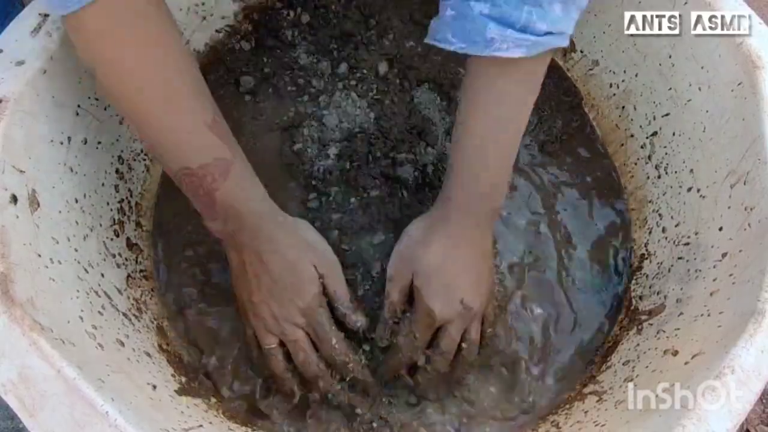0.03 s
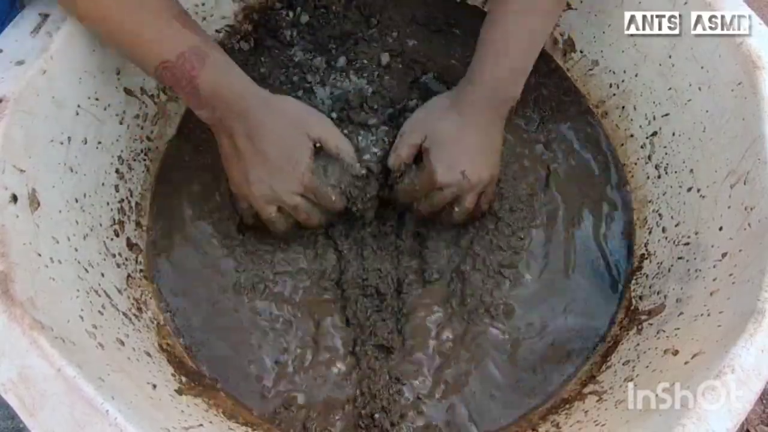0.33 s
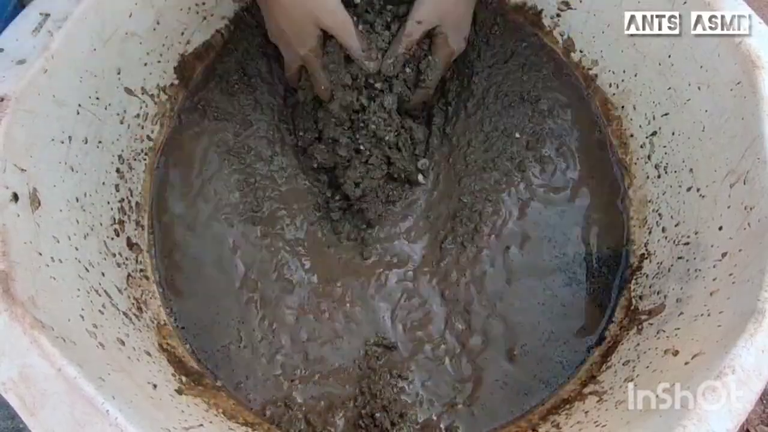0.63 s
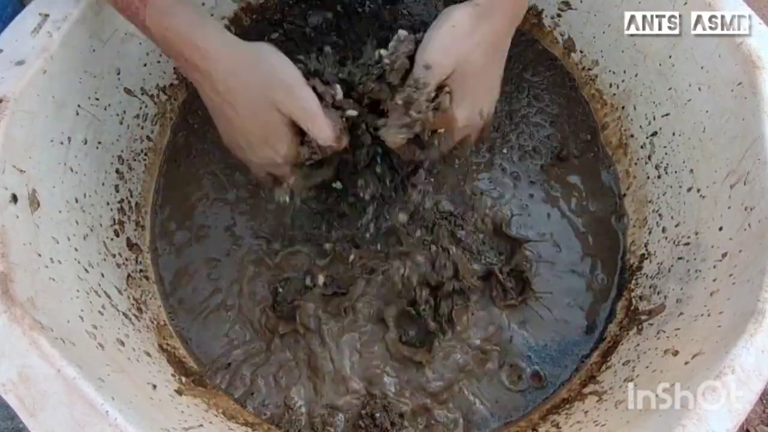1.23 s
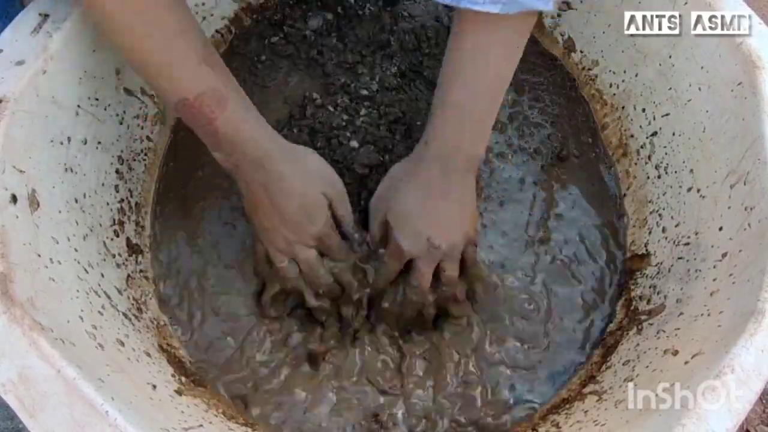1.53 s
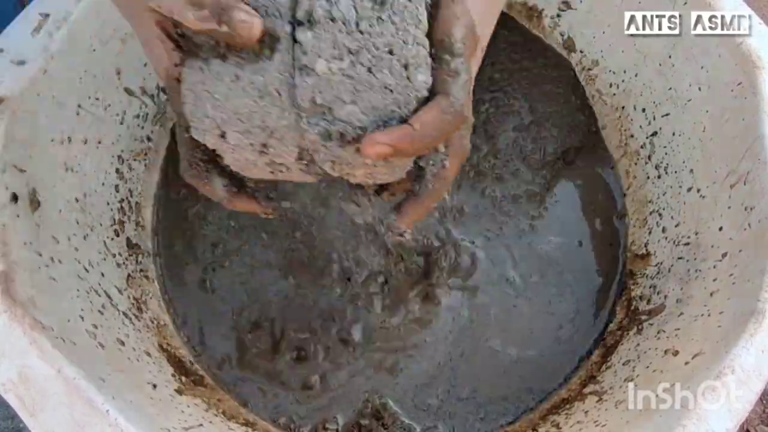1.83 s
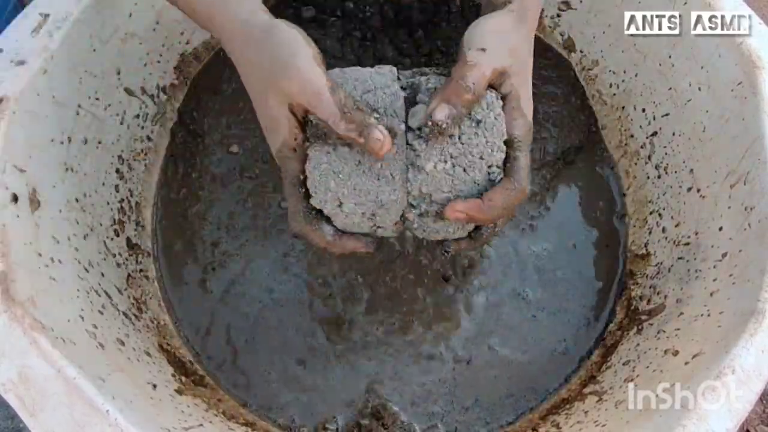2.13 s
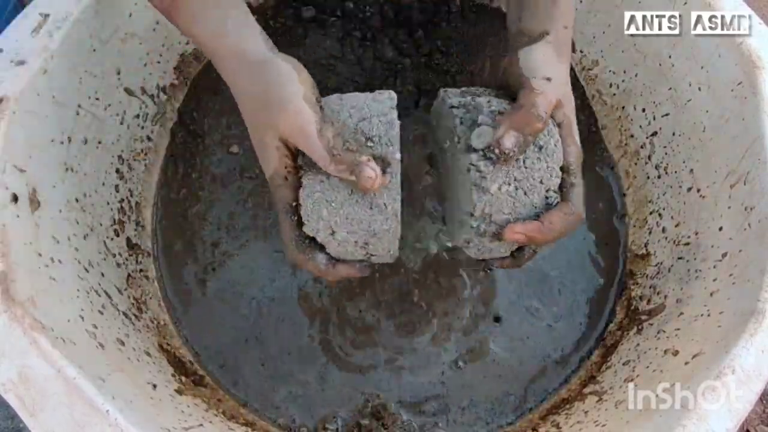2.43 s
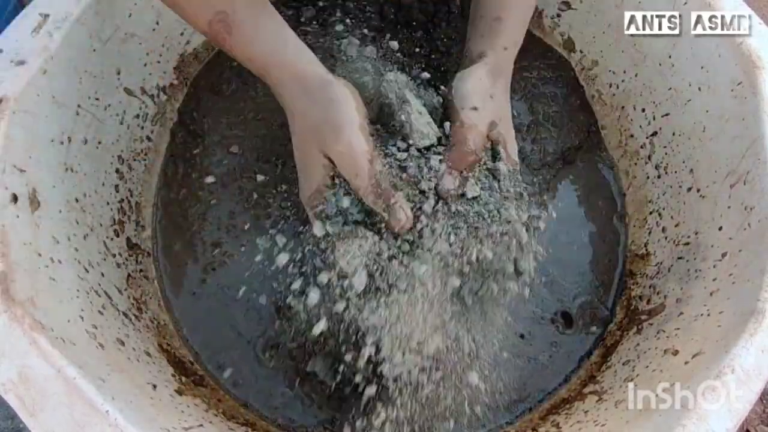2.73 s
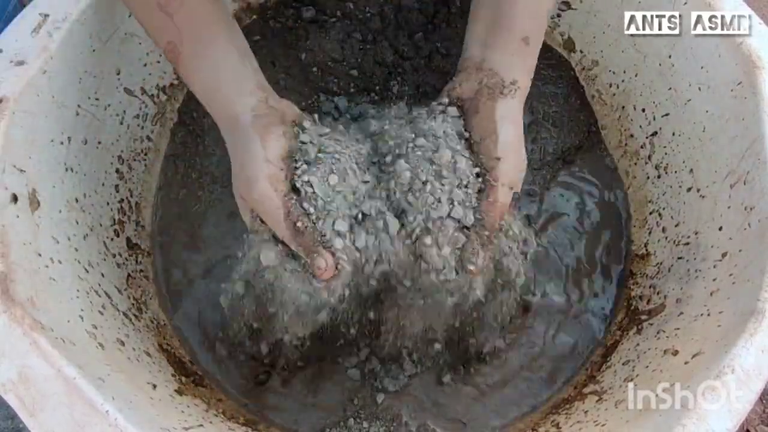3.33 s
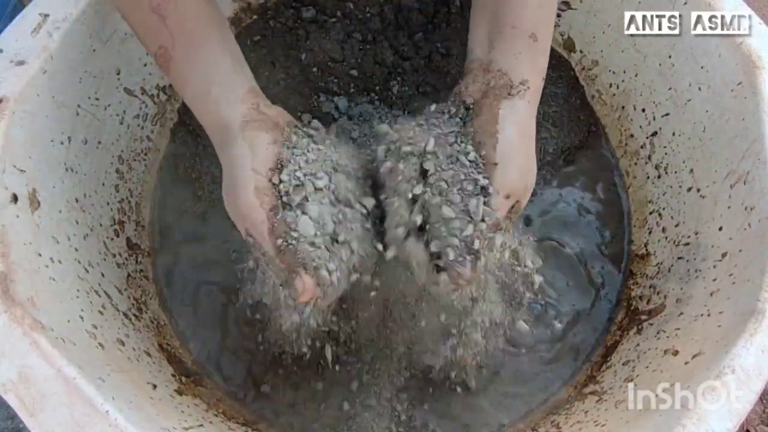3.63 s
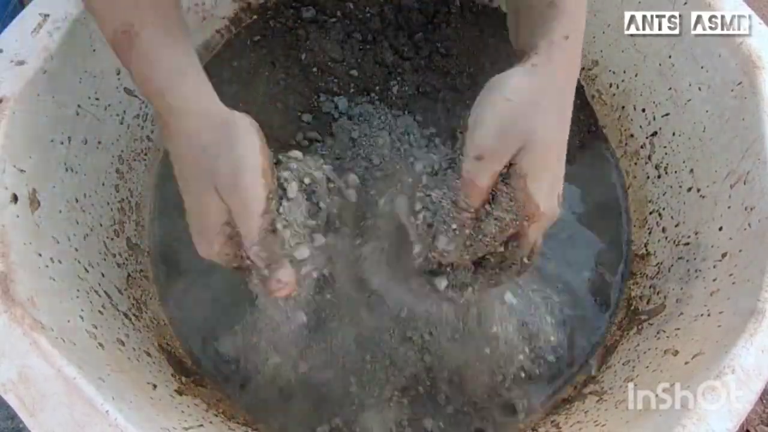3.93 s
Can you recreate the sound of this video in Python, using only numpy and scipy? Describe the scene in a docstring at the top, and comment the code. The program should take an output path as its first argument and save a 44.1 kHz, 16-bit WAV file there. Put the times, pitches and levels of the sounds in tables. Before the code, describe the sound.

Hands rake wet gritty mud in water, then dry blocks knock and crumble into it.

```python
"""Raking mud and crumbling dry blocks

Hands rake wet grit through a tub of muddy water and let it dribble back, while puffs of air buffet
the microphone. After an abrupt cut, two dry blocks shed sand, knock together, collapse and are
crumbled into the water. A low outdoor rumble lies under it all. The grit is made of thousands of
tiny impacts, and each bubble is a short ring that rises in pitch."""
import sys
import numpy as np
from scipy import signal
from scipy.fft import rfft, irfft, next_fast_len
from scipy.io import wavfile
from scipy.ndimage import uniform_filter1d, map_coordinates

SR = 44100
rng = np.random.default_rng(int(sys.argv[2]) if len(sys.argv) > 2 else 0)


def unload_wav(signal):
    """Save mono or channel-first audio to the path in sys.argv[1] as 16-bit WAV at rate SR, clipped to [-1, 1]."""
    wavfile.write(
        sys.argv[1],
        SR,
        np.round(np.clip(np.atleast_2d(signal).T, -1, 1) * 32767).astype(np.int16),
    )


N = 176400
CUT_S = 1.615  # the mud scene ends and the block scene begins

# How loud each action is over time. Levels in all tables are before mixing.
# Raking the mud: time_s, slosh_db, scrape_db, fizz_db
RAKING = [(0.005, -13, -28.5, -28), (0.017, -27, -36, -29), (0.031, -41, -28, -31), (0.079, -29, -42, -41),
          (0.133, -27.5, -25.5, -41), (0.173, -29.5, -27, -31), (0.321, -30, -29.5, -35.5),
          (0.451, -28.5, -29, -35), (0.589, -24, -27.5, -34.5), (0.639, -29, -32, -38),
          (0.799, -29.5, -32, -37.5), (0.879, -31.5, -33.5, -38.5), (1.075, -32.5, -29.5, -34.5),
          (1.295, -43, -32.5, -29.5), (1.365, -43, -35, -34.5), (1.425, -56, -47.5, -42.5),
          (1.46, -33, -36.5, -39), (1.555, -30.5, -33, -41), (1.61, -31.5, -37, -43.5)]
# Sand trickling off the blocks: time_s, patter_db, hiss_db
TRICKLE = [(1.63, -45, -42), (1.634, -47.5, -39), (2.212, -51, -44.5), (2.246, -54, -53),
           (2.518, -58.5, -56), (2.558, -53, -54), (2.6, -70, -86)]
# Crumbling the blocks: time_s, crunch_db, grit_db, hiss_db
CRUMBLE = [(2.66, -45, -47.5, -46), (2.69, -48.5, -55, -46), (2.735, -29, -39.5, -34),
           (2.768, -23, -30.5, -26), (2.794, -34, -31.5, -30.5), (2.868, -28.5, -34, -28.5),
           (2.95, -44.5, -41, -38), (3.152, -37.5, -36.5, -40), (3.302, -49, -48, -42.5),
           (3.532, -35, -38.5, -37.5), (3.61, -49.5, -49.5, -43), (3.652, -56, -52, -39),
           (3.69, -49.5, -51, -41.5), (3.786, -40, -41.5, -39), (3.846, -39.5, -41.5, -35),
           (3.854, -27, -30.5, -34), (3.868, -42.5, -48, -44.5), (3.924, -51, -52, -36),
           (4.0, -52, -49, -38.5)]

# The tone of each sound, from bass to treble: frequency_hz, level_db
RUMBLE_TONE = [(45, -57), (75, -8), (110, 1), (150, 2), (200, -7.5), (300, -12.5), (550, -14.5),
               (1000, -19.5), (2500, -33), (6000, -41.5)]
PUFF_TONE = [(45, -50), (70, -0.5), (100, 3.5), (170, 0.5), (260, -10), (400, -18), (800, -50.5)]
SLOSH_TONE = [(150, -46), (260, -10), (400, -20), (540, 1.5), (750, -5.5), (1100, 2), (1500, -5),
              (2100, -2), (3500, -28)]
SCRAPE_TONE = [(800, -27), (1400, -4), (1900, -3), (2600, -2), (3500, -1.5), (4500, -5.5), (5600, -14),
               (8000, -23)]
FIZZ_TONE = [(3000, -9), (4500, -7), (5700, -4.5), (7300, 6), (8600, 3.5), (10500, -3), (12500, -7.5),
             (14500, -3), (16000, -20)]
CRUNCH_TONE = [(180, -27), (380, -8.5), (580, 1.5), (760, -9.5), (1000, 0), (1400, -3), (1850, -3.5),
               (3500, -45)]
GRIT_TONE = [(800, -9.5), (1400, -6.5), (1900, -1), (2700, -1), (3800, -2.5), (4700, -10), (5800, -15),
             (8000, -20)]
SAND_TONE = [(3000, -7.5), (4500, -3), (5700, -6.5), (7400, 4.5), (8800, 1), (10800, -4.5), (12500, -2.5),
             (14500, 1), (16000, -3)]
TINKLE_TONE = [(7000, -23), (10000, -14), (12500, 0.5), (15000, 0)]

# How alike left and right are (1 is identical): frequency_hz, likeness
LIKENESS = [(250, 1), (600, 0.88), (1200, 0.72), (2200, 0.05), (4000, 0.024), (7500, 0.48), (11000, 0.34),
            (15000, 0.13)]
# How much louder the left side is: frequency_hz, left_minus_right_db
BALANCE = [(1200, 0), (2500, 0.6), (4500, 2.5), (6000, 4), (8000, 2), (9500, -0.5), (12000, 3.5),
           (15000, 12)]
# Where air hits the microphone: side, left_minus_right_db
SIDE_DB = {"left": 48, "both": 0.5, "right": -21.5}
# Puffs of air: centre_s, length_s, level_db, side
PUFFS = [(0.021, 0.023, -17.5, "left"), (0.064, 0.036, -25, "right"), (0.154, 0.064, -21.5, "right"),
         (0.256, 0.017, -21, "both"), (0.307, 0.023, -24, "right"), (0.485, 0.036, -19, "both"),
         (0.538, 0.014, -26, "left"), (0.589, 0.022, -20, "both"), (0.62, 0.026, -21.5, "right"),
         (0.705, 0.05, -27.5, "right"), (0.765, 0.026, -21, "both"), (0.837, 0.031, -23, "right"),
         (1.067, 0.024, -27.5, "left"), (1.111, 0.028, -25, "left"), (1.289, 0.043, -15, "left"),
         (1.387, 0.02, -31, "both"), (1.453, 0.031, -22, "left"), (1.516, 0.05, -20, "left"),
         (1.585, 0.026, -18.5, "left"), (1.753, 0.078, -28.5, "left"), (1.884, 0.031, -28, "left")]
# Sharp pops of air: time_s, level_db, side
POPS = [(0.029, -10.5, "left"), (0.041, -10, "right"), (0.076, -15.5, "right"), (0.119, -13.5, "right"),
        (0.171, -13, "left"), (0.594, -12.5, "right"), (0.637, -12.5, "right"), (1.256, -13, "left"),
        (1.29, -13.5, "left"), (1.322, -9, "left"), (1.36, -14, "left"), (1.673, -9.5, "left"),
        (1.776, -11, "left"), (2.266, -22.5, "right"), (3.654, -23.5, "right")]
# Single bubbles and drips: start_s, level_db, pitch_hz
DRIPS = [(1.403, -25, 2500), (1.553, -30, 1420), (1.573, -24, 730), (1.606, -16, 1426), (1.974, -38, 2070),
         (2.006, -34, 2400), (2.025, -33, 2600), (2.106, -37, 1740), (2.327, -41, 1690), (2.553, -39, 2100),
         (2.753, -18, 1020), (2.771, -33, 1100), (2.809, -20.5, 1206), (3.35, -31.5, 1670),
         (3.8515, -21, 938)]
# Grains splitting: start_s, level_db
CLICKS = [(1.24, -14), (3.4912, -12), (3.512, -20), (3.639, -9), (3.7238, -19), (3.8285, -15), (3.843, -10),
          (3.9275, -12)]
# Grains and lumps snapping: start_s, tick_db, body_db, decay_s
SNAPS = [(.045, -21, -38, 0.014), (.057, -33, -20, 0.017), (1.241, -22, -27.5, 0.046),
         (1.701, -30, -45, 0.019), (1.7602, -30, -55, 0.045), (1.779, -28, -51, 0.013),
         (1.8988, -19.5, -54, 0.015), (2.067, -31, -52, 0.028), (2.567, -34.5, -47, 0.026),
         (2.705, -37, -35, 0.036), (2.763, -28, -20, 0.037), (2.846, -24, -24, 0.024),
         (3.372, -34.5, -47, 0.26), (3.4902, -18, -36, 0.0092), (3.5105, -20.5, -25.5, 0.022),
         (3.6382, -18.5, -40, 0.009), (3.652, -27, -32, 0.03), (3.827, -19.5, -26, 0.018),
         (3.852, -24, -25, 0.012), (3.946, -29, -37, 0.032)]
# The blocks meeting: start_s, level_db
KNOCKS = [(2.628, -7), (2.6319, -13.5)]
# The notes a struck block rings with: pitch_hz, level_db, decay_s
BLOCK_NOTES = [(184, -8.5, 0.066), (278, -2, 0.025), (462, -2, .028), (653, -1, 0.021),
               (1360, -7.5, 0.0084), (1940, -17, .014), (3180, -19.5, 0.03)]
# Fingers digging in: start_s, length_s, swell_s, first_hz, last_hz, glide_bend, scatter_octaves, level_db
STROKES = [(0.116, .31, 0.052, 2610, 935, 1.67, 0.352, -30),
           (.505, 0.39, 0.066, 1750, 1034, 1.48, 0.43, -32.5),
           (1.451, .16, 0.06, 2680, 995, 0.74, 0.29, -32.5)]


def amp(db):
    """Turn decibels into a gain; a decay time is how long a sound takes to fall 60 dB."""
    return 10 ** (np.asarray(db) / 20)


def unit(x):
    """Scale a signal to an average power of 1."""
    return x / np.sqrt(np.mean(x ** 2) + 1e-20)


def along(points, hz):
    """Read between the rows of a frequency table, on a log scale."""
    freqs, values = np.transpose(points)
    return np.interp(np.log(hz + 1), np.log(freqs + 1), values)


def clock():
    """The time of every sample, in seconds."""
    return np.arange(N) / SR


def gains(rows):
    """One gain curve for each level column of a table."""
    times, *levels = np.transpose(rows)
    return [amp(np.interp(clock(), times, db)) for db in levels]


def wobble(rate):
    """A smooth curve through `rate` random values a second."""
    return map_coordinates(rng.standard_normal(4096), [clock() * rate], mode="mirror")


def filtered(x, response):
    """Scale each frequency in x by response(hz)."""
    size = next_fast_len(N + 8192)
    return irfft(rfft(x, size) * response(np.fft.rfftfreq(size, 1 / SR)), size)[..., :N]


def pan(db):
    """Left and right gains, with the left louder by db."""
    return unit(amp(np.array([[db], [-db]]) / 2))


def add(track, start_s, sound):
    """Mix a short sound into a track."""
    i = max(0, round(start_s * SR))
    part = track[..., i:i + sound.shape[-1]]
    part += sound[..., :part.shape[-1]]


def noise(tone, likeness=LIKENESS, sizes=1):
    """Stereo noise with the given tone; sizes scales each sample before the tone is shaped."""
    def response(hz):
        angle = np.arccos(np.clip(along(likeness, hz), -1, 1)) / 2
        return amp(along(tone, hz)) * [np.cos(angle), np.sin(angle)]
    mid, side = filtered(sizes * rng.standard_normal((2, N)), response)
    return unit(np.array([mid + side, mid - side]))


def patchy(x, depth_db):
    """Let resonances come and go as the water and the heap change shape."""
    spectra = signal.stft(x, nperseg=512)[2]
    patches = rng.standard_normal(spectra.shape[1:])
    for _ in range(2):
        patches = uniform_filter1d(uniform_filter1d(patches, size=4, axis=0), size=7, axis=1)
    less_in_treble = 1 / np.hypot(1, np.fft.rfftfreq(512, 1 / SR) / 6000)
    change = amp(depth_db * unit(patches) * less_in_treble[:, None])
    return signal.istft(spectra * change, nperseg=512)[1][:, :N]


def grains(tone, rate, spread, clump, patchy_db=2):
    """About `rate` tiny impacts a second; spread varies their size, clump makes them surge."""
    hits = rng.random(N) < rate / SR
    sizes = hits * np.exp(spread * np.minimum(rng.standard_normal(N), 2))
    stream = patchy(noise(tone, sizes=sizes), patchy_db)
    return unit(stream * np.exp(clump * wobble(110)))


def bubble(hz, cycles=38.4, rise=0.2):
    """A fading ring whose pitch rises as the bubble nears the surface."""
    samples = SR * cycles / hz
    age = np.arange(int(samples)) / samples  # runs from 0 to 1
    ring = np.sin(2 * np.pi * cycles * (age + rise * age ** 2 / 2))
    return ring * 0.0011 ** age * (1 - np.exp(-age * cycles))


def froth(hz, octaves, spread_db, count):
    """Many small bubbles scattered in time, pitch, loudness and place."""
    out = np.zeros((2, N))
    starts = rng.random(count) * N / SR
    scatter = np.clip(rng.standard_normal((count, 3)), -2, 2)
    for start, (pitch, size, place) in zip(starts, scatter):
        add(out, start, amp(spread_db * size) * pan(4 * place) * bubble(hz * 2 ** (octaves * pitch)))
    return unit(out)


def rumble():
    """A low, steady outdoor rumble."""
    return amp(-40) * noise(RUMBLE_TONE, likeness=[(60, 0.47), (150, 0.97), (600, 0.27), (2000, 0.061)])


def air(pop_hz=157):
    """Puffs and pops of air hit the microphone's two openings unequally."""
    t, puffs, pops = clock(), np.zeros((2, N)), np.zeros((2, N))
    for centre, length, db, side in PUFFS:
        puffs += amp(db) * pan(SIDE_DB[side]) * np.exp(-2 * ((t - centre) / length) ** 2)
    for centre, db, side in POPS:
        away = (np.pi * pop_hz * (t - centre)) ** 2
        pops += amp(db) * pan(SIDE_DB[side]) * (2 * away - 1) * np.exp(-away)
    swirl = noise(PUFF_TONE, likeness=[(100, 0)])
    swirl /= np.sqrt(np.abs(uniform_filter1d(swirl ** 2, size=800)) + 0.021)  # even out its loudness
    draught = amp(-38.5) * (t < CUT_S)
    return (puffs + draught) * swirl + pops


def tub(x, decay_s=0.013, echo_db=-11):
    """Add quick echoes from the walls of the tub."""
    t = clock()[:SR // 6]
    tail = rng.standard_normal((2, len(t))) * amp(-60 * t / decay_s) * (t > .0015)
    echoes = signal.fftconvolve(x, tail / np.linalg.norm(tail[0]), axes=1)[:, :N]
    return x + amp(echo_db) * echoes


def tinkle():
    """Fine grains and droplets make sparse, very bright ticks."""
    return grains(TINKLE_TONE, rate=320, spread=0.59, clump=0.085)


def dribble(centre_s=1.22, width_s=0.18):
    """Wet grit pours from the lifted hands and sprays on the water."""
    swell = np.exp(-((clock() - centre_s) / width_s) ** 2)
    return amp(-29.5) * swell * grains(TINKLE_TONE, rate=5700, spread=0.27, clump=0.27)


def drips():
    """Larger bubbles ring out one at a time."""
    out = np.zeros(N)
    for start, db, hz in DRIPS:
        add(out, start, amp(db + 3.5) * bubble(hz))
    return out


def trickle():
    """Loose sand falls from the blocks and patters on the water."""
    patter, hiss = gains(TRICKLE)
    drops = amp(-1) * grains(GRIT_TONE, rate=3000, spread=0.2, clump=0.21)
    drops += amp(-18) * froth(2380, octaves=0.43, spread_db=0, count=1200)
    sand = amp(0.5) * grains(SAND_TONE, rate=5200, spread=0.1, clump=0.28)
    return patter * drops + hiss * sand


def clicks(ring_hz=12500, decay_s=.0006):
    """Hard grains split with very short, bright clicks."""
    out, t = np.zeros(N), clock()[:SR // 100]
    for start, db in CLICKS:
        add(out, start, amp(db - 60 * t / decay_s) * np.cos(2 * np.pi * ring_hz * t))
    return out


def snaps(attack_s=0.00085):
    """Each snap is a bright tick over a duller burst from the lump that breaks."""
    tick, body, t = np.zeros(N), np.zeros(N), clock()[:SR // 8]
    rise = 1 - np.exp(-t / attack_s)
    for start, tick_db, body_db, decay in SNAPS:
        add(tick, start, rise * amp(tick_db - 60 * t / decay))
        add(body, start, rise * amp(body_db - 60 * t / decay))
    bright = amp(2.5) * patchy(noise(SAND_TONE), depth_db=3.5)
    bright += amp(-7.5) * noise(TINKLE_TONE) + amp(-12) * noise(GRIT_TONE)
    dull = amp(-4) * noise(GRIT_TONE) + amp(2) * noise(CRUNCH_TONE)
    return tick * bright + body * dull


def knock(lowest_hz=125):
    """The blocks meet: a dull double knock, a gritty crack and a spray of loosened sand."""
    ring, crack, spray = np.zeros((3, N))
    t = clock()[:SR // 4]
    for start, db in KNOCKS:
        for hz, note_db, decay in BLOCK_NOTES:
            add(ring, start, amp(db + note_db - 60 * t / decay) * np.sin(2 * np.pi * hz * t))
    first_s = KNOCKS[0][0]
    add(crack, first_s, amp(-20 - 60 * t / .028))
    add(spray, first_s, amp(-27.5 - 60 * t / 0.077))
    thud = signal.sosfilt(signal.butter(3, lowest_hz, "high", fs=SR, output="sos"), ring)
    grit = noise(GRIT_TONE)
    sand = grains(SAND_TONE, rate=6300, spread=0.22, clump=0.091)
    return thud + crack * grit + spray * sand


def crumble():
    """The blocks crunch in the hands; grit and sand rain into the water."""
    crunch, grit, hiss = gains(CRUMBLE)
    lumps = amp(-1) * grains(CRUNCH_TONE, rate=2200, spread=0.38, clump=0.099)
    lumps += amp(-10.5) * froth(1022, octaves=0.27, spread_db=3, count=800)
    chips = amp(0.5) * grains(GRIT_TONE, rate=3500, spread=0.13, clump=0.054)
    chips += amp(-8.5) * froth(2620, octaves=0.4, spread_db=-2, count=1000)
    sand = amp(1.5) * grains(SAND_TONE, rate=7000, spread=0.082, clump=0.087) + amp(-16) * tinkle()
    pebbles = amp(-9) * grains(GRIT_TONE, rate=160, spread=0.25, clump=0)
    return crunch * lumps + grit * (chips + pebbles) + hiss * sand


def squelches(count=420, clump_db=1.8, narrowing=1.47):
    """Each stroke of the hands frees bubbles that come larger, so lower, and more alike as it goes."""
    out = np.zeros((2, N))
    for start, length, swell, first_hz, last_hz, bend, octaves, db in STROKES:
        swarm = np.zeros((2, N))
        bubbles = zip(rng.random(count), rng.uniform(-1, 1, count), rng.normal(0, 6, count))
        for progress, scatter, place_db in bubbles:
            glide_hz = last_hz * (first_hz / last_hz) ** ((1 - progress) ** bend)
            hz = glide_hz * 2 ** (2 * octaves * scatter * np.exp(-narrowing * progress))
            age = progress * length / swell
            level = min(.2 + age ** 2, 1 / np.sqrt(age + 1e-6))  # swells, then eases off
            level *= np.sqrt(1 - progress ** 4)
            add(swarm, start + progress * length, level * pan(place_db) * bubble(hz))
        out += amp(db) * unit(swarm * amp(clump_db * wobble(69.67))) * np.sqrt(length * SR / N)
    return out


def mud():
    """Water sloshes and bubbles round the fingers, gravel scrapes, droplets fizz."""
    slosh, scrape, fizz = gains(RAKING)
    water = amp(-3) * grains(SLOSH_TONE, rate=3500, spread=0.24, clump=0.045, patchy_db=1)
    water += amp(-6.5) * froth(809, octaves=0.542, spread_db=0.5, count=600)
    gravel = amp(-0.5) * grains(SCRAPE_TONE, rate=6000, spread=0.12, clump=0.031, patchy_db=2.5)
    gravel += amp(-9.5) * froth(2945, octaves=0.3, spread_db=2, count=1300)
    spray = amp(2.5) * grains(FIZZ_TONE, rate=9000, spread=0.057, clump=0.18) + amp(-5.5) * tinkle()
    churn = (slosh / amp(-28.5)).clip(0, 2) ** 1.56  # deep bubbles swell faster than the slosh
    gulps = amp(-37.5) * churn * froth(475, octaves=0.346, spread_db=1.5, count=500)
    return slosh * water + gulps + scrape * gravel + squelches() + fizz * spray


def scene():
    """Wet raking until the cut, then the trickle, and from the knock on the crumbling."""
    t = clock()
    raking = mud()
    blocks = np.where(t < KNOCKS[0][0], trickle(), crumble())
    handwork = np.where(t < CUT_S, raking, blocks)
    outdoors = rumble()
    return tub(handwork + dribble() + snaps() + clicks() + drips()) + knock() + air() + outdoors


def record(dry, gap_s=0.0076, fade_in_s=0.0052, top_hz=15550):
    """The level dips briefly at the cut, the left side is brighter, and the top treble is removed."""
    t = clock()
    dip = np.where(t < CUT_S, 1, np.clip((t - CUT_S - gap_s) / fade_in_s, .1, 1))
    sides = np.array([[.5], [-.5]])
    return filtered(dry * dip, lambda hz: amp(along(BALANCE, hz) * sides) * (hz < top_hz))


dry = scene()
out = record(dry)
unload_wav(out)
```